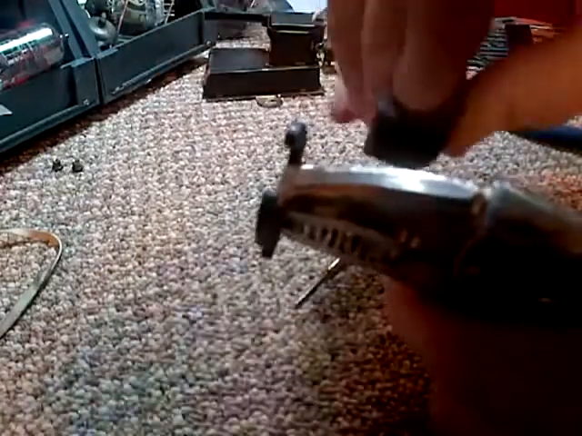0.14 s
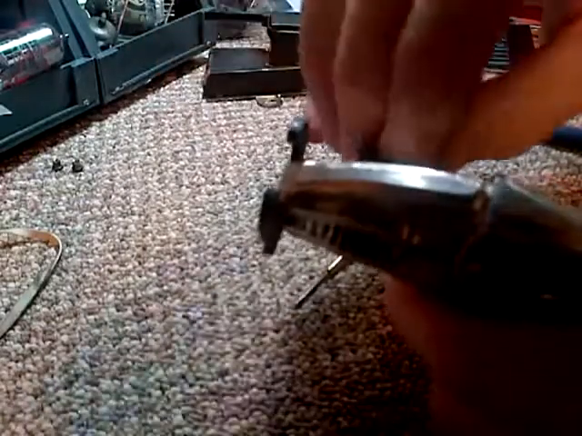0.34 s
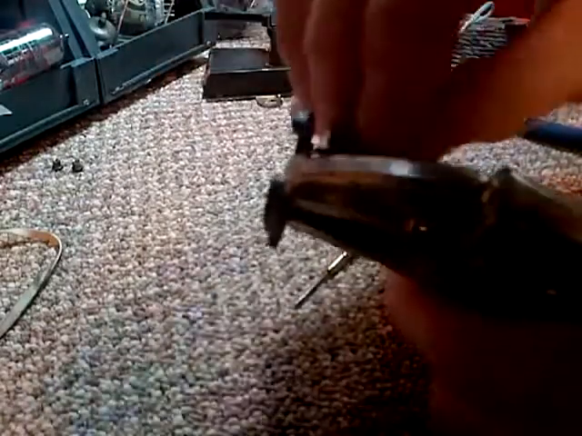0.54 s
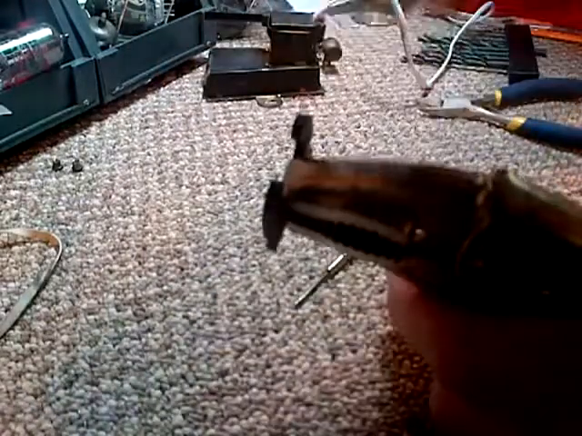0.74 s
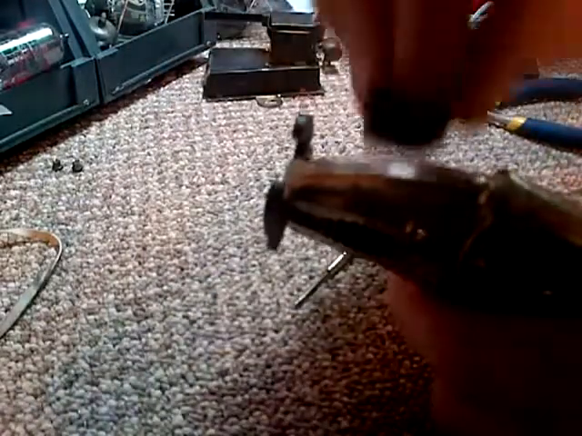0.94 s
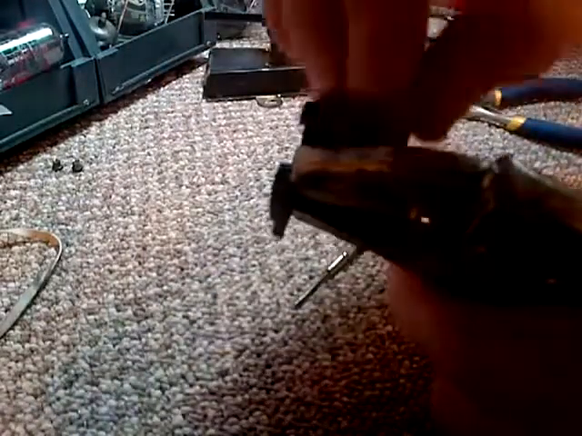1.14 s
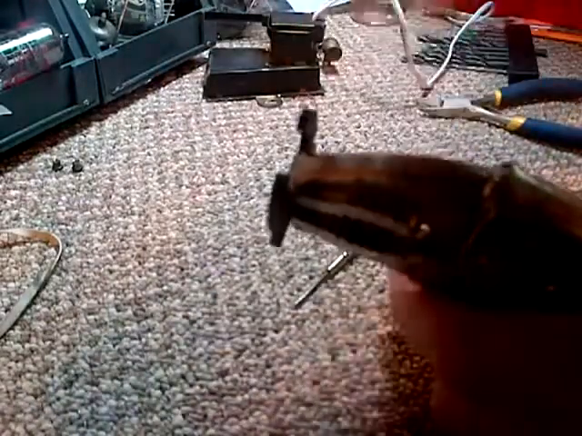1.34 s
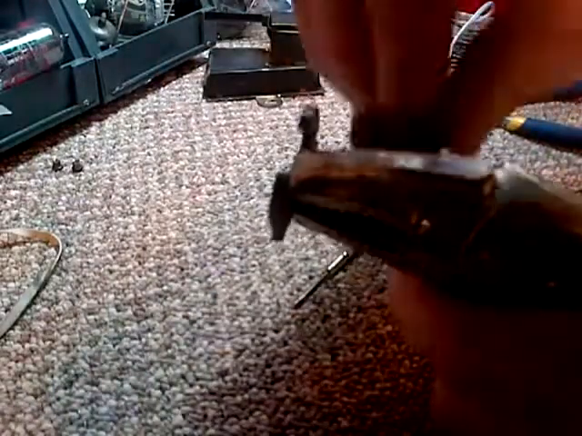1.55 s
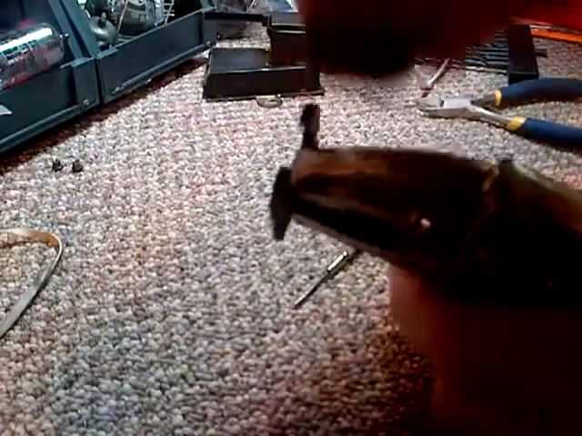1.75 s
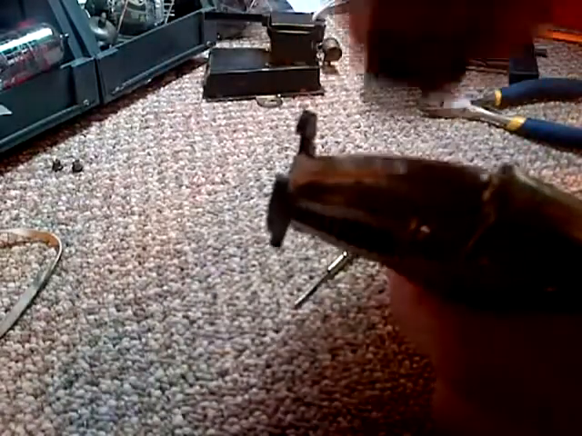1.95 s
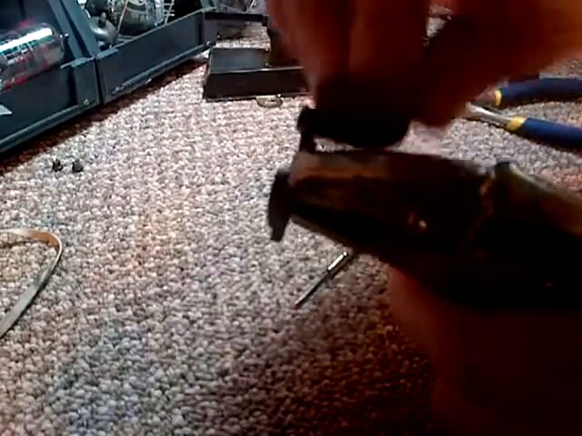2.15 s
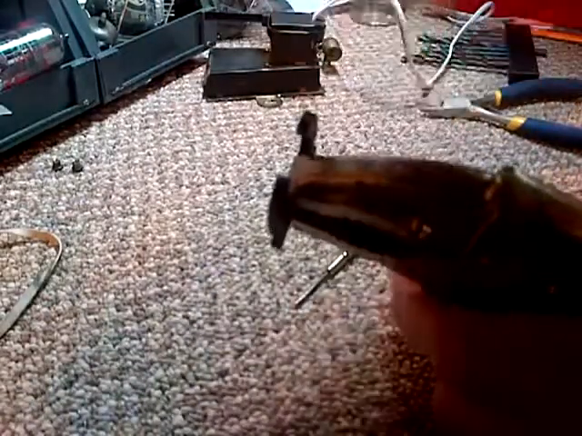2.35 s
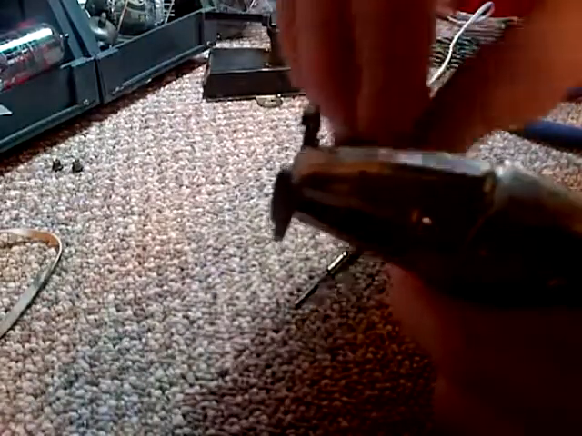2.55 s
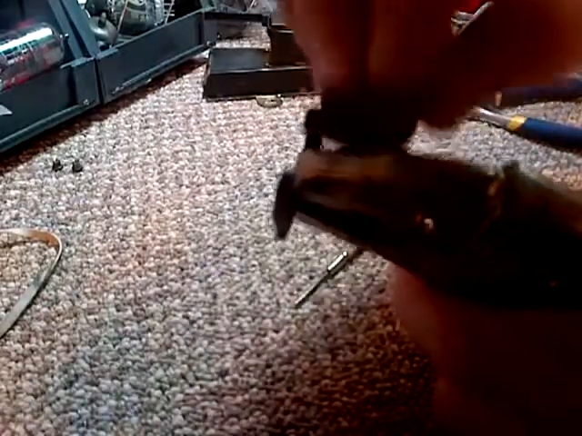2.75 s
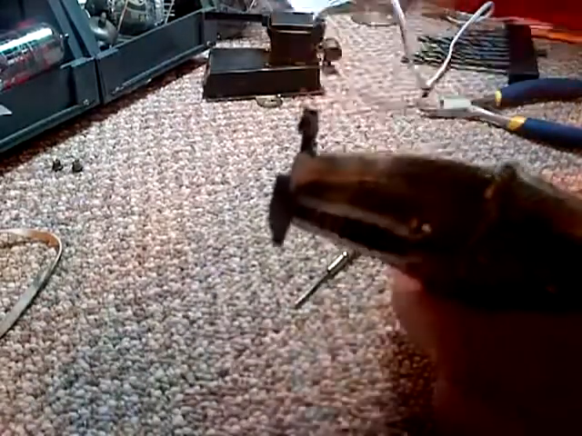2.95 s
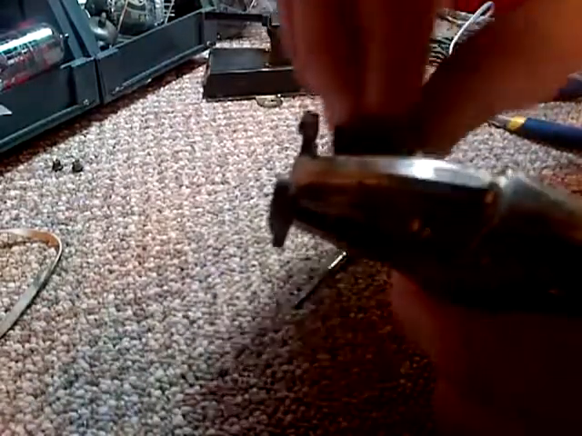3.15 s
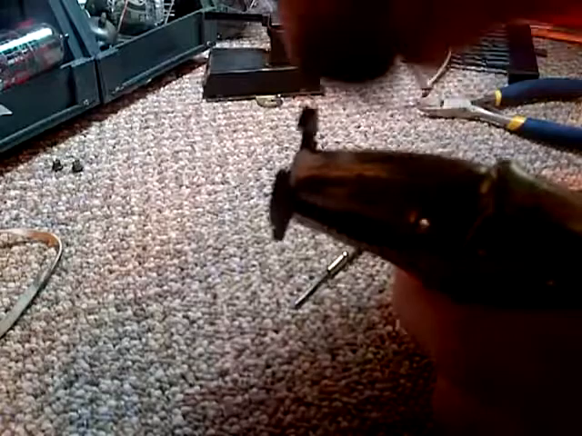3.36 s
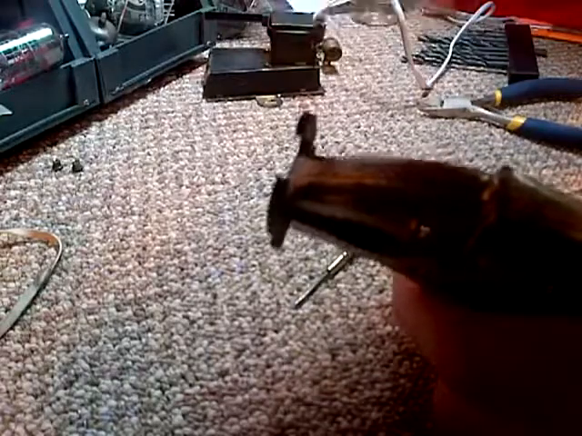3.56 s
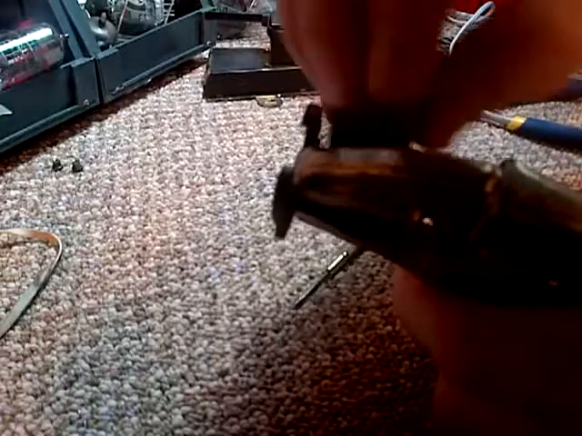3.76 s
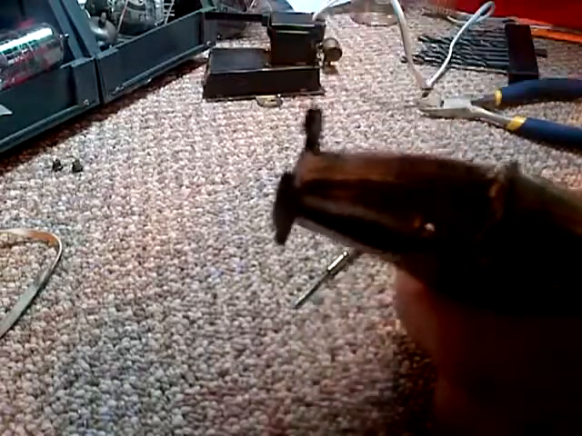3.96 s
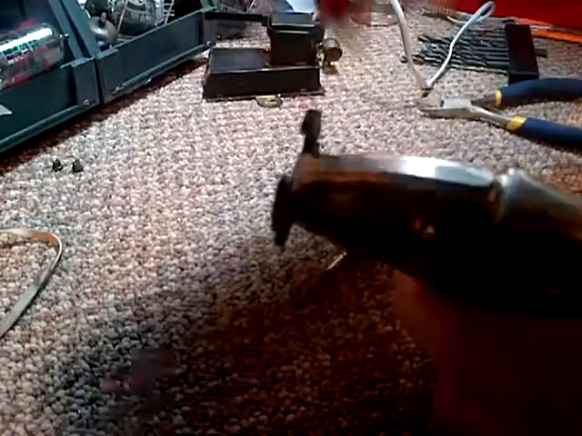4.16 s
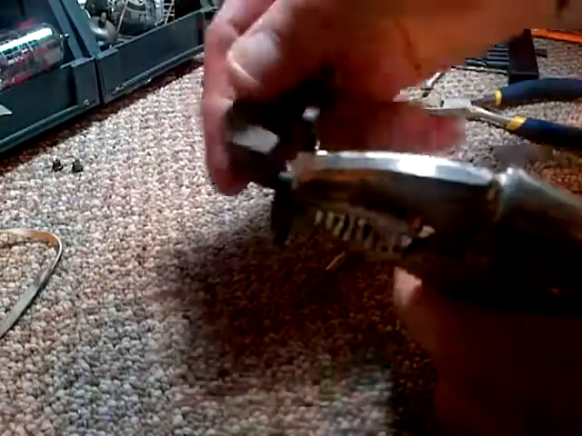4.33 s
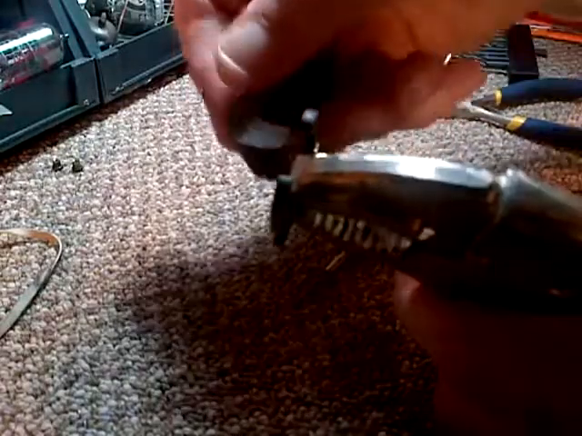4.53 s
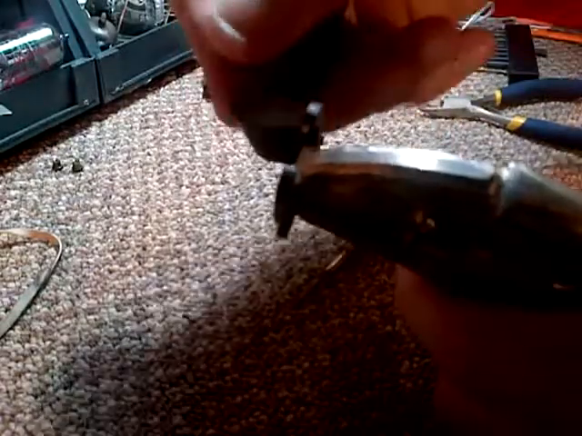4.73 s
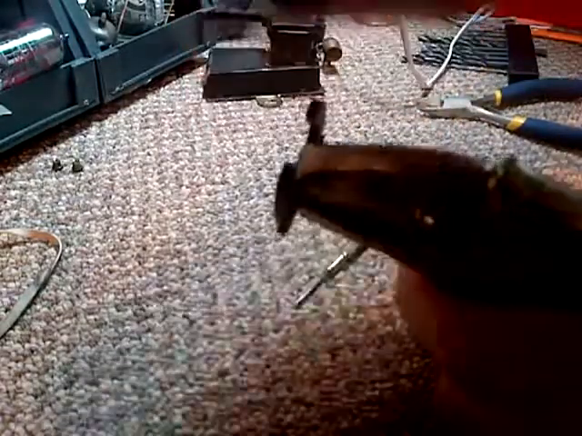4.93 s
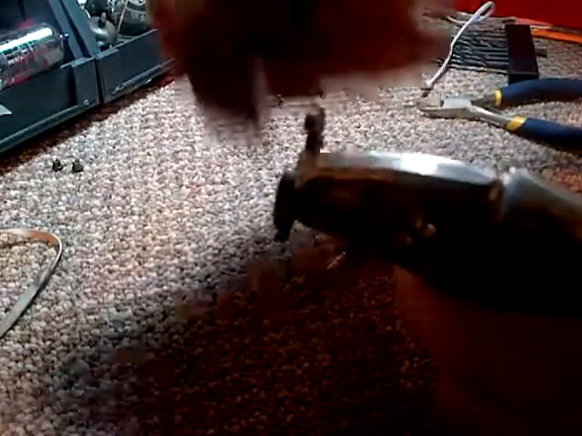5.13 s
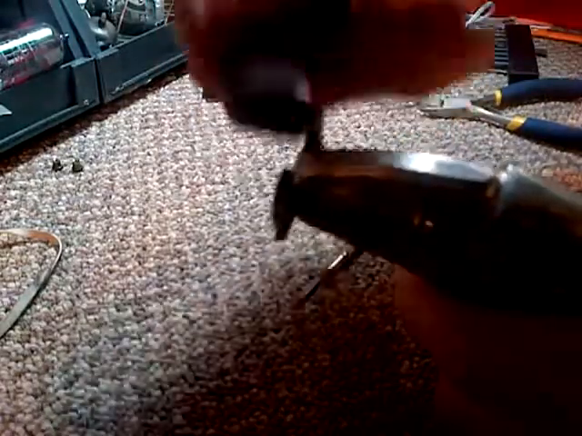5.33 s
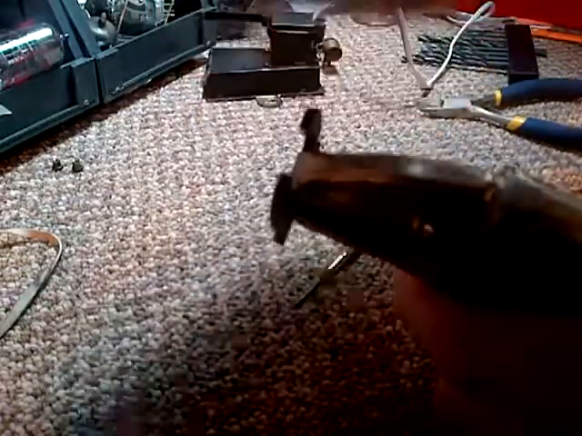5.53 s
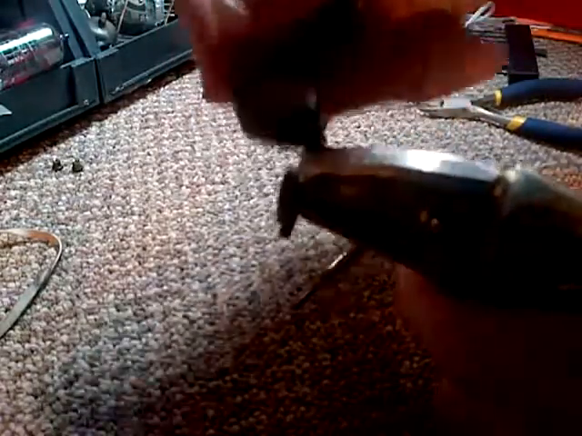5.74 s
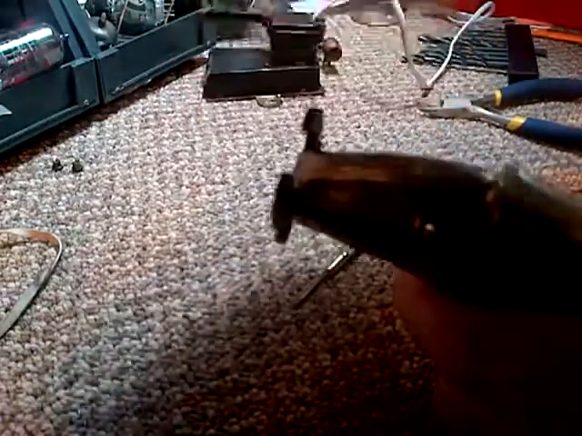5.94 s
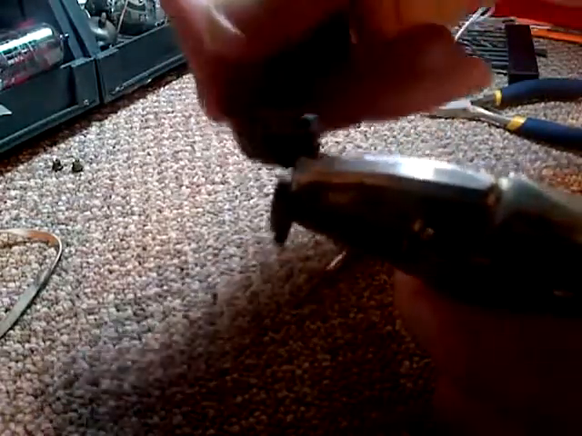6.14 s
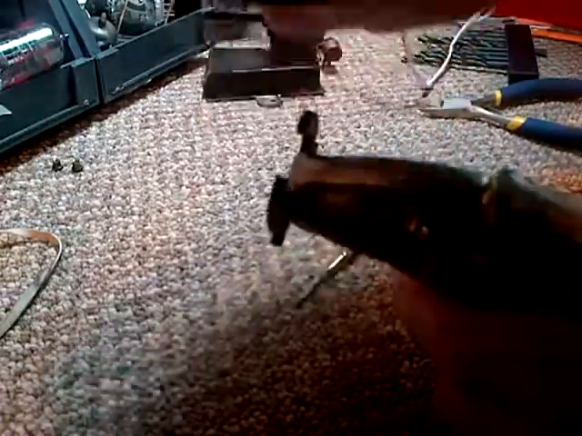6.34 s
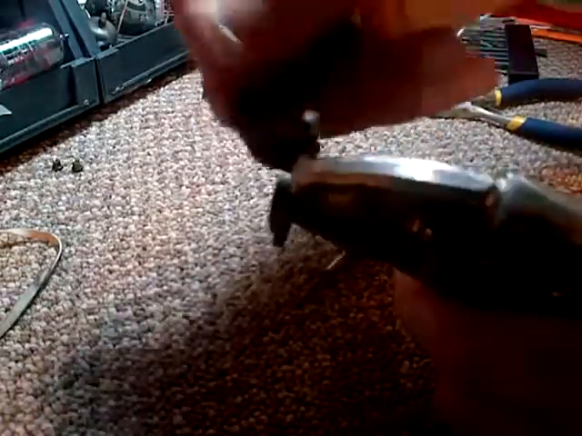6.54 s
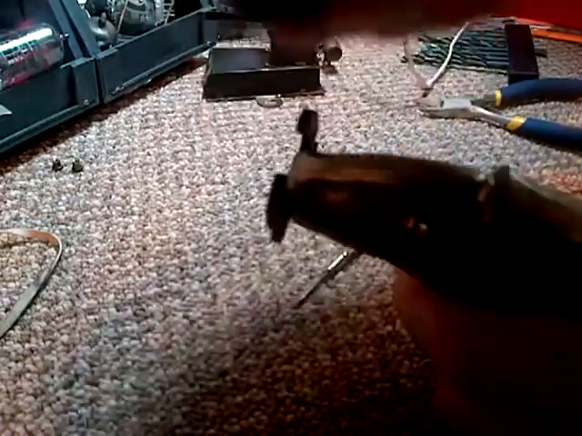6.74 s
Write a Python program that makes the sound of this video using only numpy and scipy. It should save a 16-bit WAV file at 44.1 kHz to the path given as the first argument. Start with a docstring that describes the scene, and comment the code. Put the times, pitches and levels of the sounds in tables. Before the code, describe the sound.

Close, sharp metallic clicks and short rasps as a magnet snaps on and off hand-held metal, over a low hum.

```python
"""A quiet workshop with a low hum. Close to a two-port microphone, a little to the right, a hand snaps a
small magnet onto the top of a hand-held metal piece: it clacks and chatters, rasps as it is dragged along,
then tears loose with a rattle and leaves the metal ringing, seven times over. Just after 4 s the grip
shifts with a soft brush of skin. Five more rounds follow at the tip, where the magnet slips over the edge
with a quick buzz and a ping."""
import sys
import numpy as np
from scipy import signal
from scipy.fft import rfft, irfft
from scipy.io import wavfile

SR = 44100
rng = np.random.default_rng(int(sys.argv[2]) if len(sys.argv) > 2 else 0)


def transcribe(u):
    """Save the signal u as a 16-bit wav file named by the first command-line argument.

    u: samples, shape (n,) or (channels, n), limited to [-1, 1]; the rate is SR.
    q: integer samples, one column per channel.
    """
    v = np.clip(np.atleast_2d(u).T, -1, 1)
    q = np.round(v * 32767).astype(np.int16)
    wavfile.write(sys.argv[1], SR, q)


N = 299439
TIME, FREQS = np.arange(N) / SR, np.fft.rfftfreq(N, 1 / SR)
TIP_FROM_S = 4  # from here on the magnet meets the tip


def gain_of(db):
    """Decibels to amplitude."""
    return 10 ** (np.asarray(db) / 20)


def unit_rms(x):
    """Scales to rms 1."""
    return x / np.sqrt(np.mean(x ** 2) + 1e-20)


def unit_energy(x):
    """Scales to energy 1."""
    return x / np.linalg.norm(x)


def curve(points, hz):
    """Joins (f/Hz, value) points on a log-frequency axis."""
    f, value = np.transpose(points)
    return np.interp(np.log(hz + 1), np.log(f + 1), value)


def fade(t, t60):
    """Falls by 60 dB in t60 seconds."""
    return np.exp(-np.log(1000) * t / np.maximum(t60, 1e-4))


def add(mix, s, sound):
    """Mixes a sound in at time s."""
    part = mix[round(s * SR):][:len(sound)]
    part += sound[:len(part)]


def equalise(x, db_at, size=2048):
    """Minimum-phase EQ whose gain in dB is db_at(Hz)."""
    log_gain = np.log(gain_of(db_at(abs(np.fft.fftfreq(size, 1 / SR)))))
    response = np.exp(np.conj(signal.hilbert(log_gain)))
    taps = np.fft.ifft(response).real[:size // 2]
    return signal.fftconvolve(x, taps)[:len(x)]


def noise(spectrum):
    """Steady noise of rms 1, shaped by (f/Hz, level/dB) points."""
    white = rfft(rng.standard_normal(N))
    return unit_rms(irfft(white * gain_of(curve(spectrum, FREQS)), N))


def room_tone(air_db=-38, waver=.25):
    """The workshop's bed: low rumble, smooth hiss and a hum that wavers in phase and level."""
    # rumble and hiss: f/Hz, level/dB
    spectrum = [(12, -8.5), (20, -2), (60, -0.5), (70, -1), (86, -5.5), (123, -10), (216, -14), (285, -18),
                (802, -26), (1660, -32.5), (1810, -33), (4670, -36), (14700, -38.5), (16000, -45)]
    # stereo likeness of the air: f/Hz, left-right correlation
    correlation = [(30, 0.23), (100, 0.11), (1000, 0.08), (4000, 0.02)]
    # hum partials: f/Hz, level/dB
    partials = [(57, -51.5), (120, -54)]
    same = curve(correlation, FREQS)
    right = noise(spectrum)
    left = irfft(same * rfft(right) + np.sqrt(1 - same ** 2) * rfft(noise(spectrum)), N)
    air = gain_of(air_db) * np.array([left, gain_of(1) * right])
    drift = waver * noise([(1, 0), (4, -6), (12, -50), (40, -140)])
    hum = sum(gain_of(db) * unit_rms(np.sin(2 * np.pi * hz * TIME + drift)) for hz, db in partials)
    return air + hum * (1 + drift)


def reverb(x, near_db=-12, near_t60=0.031, tail_db=-19):
    """Quick reflections from things nearby, then a faint short tail."""
    # decay of the room: f/Hz, t60/s
    decay = [(300, 0.059), (1500, 0.15), (5000, 0.2), (14000, 0.12)]
    t = np.arange(SR // 2) / SR
    near = rng.standard_normal(len(t)) ** 3 * fade(t, near_t60) * (t > .002)
    hz, when, bands = signal.stft(rng.standard_normal(len(t)), SR, nperseg=256)
    bands *= fade(when, curve(decay, hz)[:, None])
    tail = signal.istft(bands, SR, nperseg=256)[1][:len(t)] * (t > .006)
    response = gain_of(near_db) * unit_energy(near) + gain_of(tail_db) * unit_energy(tail)
    return signal.fftconvolve(x, response)[:N]


def far_port(x, lag_samples=17):
    """The left port hears the clicks a little later and duller."""
    # EQ of the left port: f/Hz, gain/dB
    shading = [(700, 2.5), (1300, -13), (2400, -7), (4400, -22), (8100, -15.5), (15000, 4)]
    delay = np.exp(-2j * np.pi * FREQS * lag_samples / SR)
    return irfft(rfft(x) * gain_of(curve(shading, FREQS)) * delay, N)


def grip_shift():
    """Skin brushes the piece as the grip shifts, right of centre."""
    # swell of the brush: t/s, level/dB
    swell = [(4.1, -53), (4.16, -42), (4.5, -50), (4.8, -62)]
    # its dull tone: f/Hz, level/dB
    spectrum = [(120, -10), (330, 2.5), (500, -11.5), (1000, -24), (1600, -21), (6000, -34)]
    envelope = gain_of(np.interp(TIME, *np.transpose(swell)))
    return noise(spectrum) * envelope * gain_of([[-4], [1]])


def hand_bumps(t60=0.092, rise_s=0.00084):
    """Hands and held piece sway in soft, quickly damped thumps."""
    # bumps: t/s, level/dB, f/Hz
    cues = [(0.596, -27.5, 134), (1.247, -26.5, 100), (1.752, -22.5, 127), (2.188, -20.5, 91.5),
            (2.662, -25, 111), (3.33, -20, 85), (4.144, -28, 265)]
    t = np.arange(SR // 3) / SR
    envelope = fade(t, t60) * (1 - np.exp(-t / rise_s))
    track = np.zeros(N)
    for s, db, hz in cues:
        add(track, s, gain_of(db) * np.sin(2 * np.pi * hz * t) * envelope)
    return track


def ping(db, vary_db=0.5):
    """No longer damped by the magnet, the piece rings thinly."""
    # modes of the freed piece: f/Hz, t60/s, level/dB
    modes = [(1160, .17, -6), (4091, .2, -14), (4540, .1, 0), (4940, .55, -16), (6075, .2, -11),
             (7410, .2, -10), (8490, .24, -9)]
    t = np.arange(SR // 2) / SR
    ring = np.zeros(len(t))
    for hz, t60, mode_db in modes:
        gain = gain_of(db + mode_db + vary_db * rng.standard_normal())
        ring += gain * fade(t, t60) * np.sin(2 * np.pi * hz * t)
    return ring * (1 - fade(t, .01))  # softened attack


def metal(s):
    """The piece's answer to one tiny blow at time s: damped clacks and a few thin, long rings."""
    # modes with the magnet on: f/Hz, t60/s, energy struck on top/dB, energy struck at the tip/dB
    modes = [(575, 0.013, -10.5, -17), (765, 0.033, -10, -12.5), (1168, 0.011, 1, 0.5),
             (1480, 0.014, 0.5, -2), (1626, 0.055, -5, -8), (1818, 0.016, -3.5, -1.5), (2127, 0.011, -8, 0),
             (2945, 0.0096, -7.5, -5), (3323, 0.031, -1, -5), (4174, 0.0076, -3.5, 0.5),
             (4474, 0.058, 3.5, 4), (4790, 0.0037, 0, -0.5), (5244, 0.013, 2, 5), (6142, 0.021, 2.5, 6.5),
             (3257, .42, -16, -28), (4091, .22, -20, -17), (5055, .21, -27, -10), (6080, .2, -18, -18),
             (6630, 0.0095, -1.5, 4), (7443, 0.0056, -1.5, -3), (8546, 0.007, 1.5, 4),
             (9510, 0.0032, -1, 1), (11230, 0.0035, -3, -2), (12160, 0.0067, -10.5, -7.5),
             (13540, 0.0028, -15, -9)]
    t = np.arange(SR // 2) / SR
    body = np.zeros(len(t))
    for k, (hz, t60, top_db, tip_db) in enumerate(modes):
        mode = unit_energy(fade(t, t60) * np.sin(2 * np.pi * hz * t))
        body += (-1) ** k * gain_of(tip_db if s > TIP_FROM_S else top_db) * mode
    return body


def contact(force, s, length, db, clack_db, fizz_db, ring_hz, boost_db, ring_width=.05):
    """A force rings the metal; where and how flatly the magnet touches sets clack, fizz and resonance."""
    shelves = [(200, clack_db - 5.5), (600, clack_db), (1900, clack_db),
               (3500, 0), (6500, 0), (10000, fizz_db)]

    def tone_db(hz):
        detune = (hz / ring_hz - 1) / ring_width
        return curve(shelves, hz) + boost_db / (1 + detune ** 2)

    sound = equalise(signal.fftconvolve(force, metal(s)), tone_db)
    return gain_of(db) * unit_energy(sound) * np.sqrt(length * SR)  # energy of `length` seconds at db


def rub(track, s, length, db, rough_spots=85, spread_db=4, grit=.15, arch_db=7, **tone):
    """Stick and slip over a few rough spots: a slow drag is gritty, a quick release a dense buzz."""
    t = np.arange(-SR // 50, SR // 7) / SR
    catches = rng.random(len(t)) < rough_spots / (SR * length)
    strength = gain_of(spread_db * np.minimum(rng.exponential(1, len(t)), 3))
    push = rng.standard_normal(len(t))
    friction = catches * strength * np.sign(push) + grit * push
    pressure = fade(np.maximum(-t, 0), t60=.014) * fade(np.maximum(t - length, 0), t60=.024)
    pressure *= gain_of(-arch_db * abs(np.clip(t / length, 0, 1) - 1 / 3))  # hardest a third of the way
    add(track, s + t[0], contact(friction * pressure, s, length, db, **tone))


def drags():
    """The magnet rasps along the metal; a brighter drag has less low clack."""
    # drags: t/s, length/s, level/dB, brightness/dB, contact resonance/Hz
    cues = [(0.541, 0.038, -28, -6, 3920), (0.643, 0.029, -28, -2, 1540), (0.671, 0.053, -17, 0.5, 8840),
            (1.183, 0.1, -19, -1.5, 3410), (1.731, 0.073, -21.5, -0.5, 3090), (2.181, 0.028, -32, 3, 5050),
            (2.216, 0.051, -28.5, 9, 8850), (2.807, 0.0255, -18.5, 2, 7450), (2.826, 0.088, -37, 7, 5000),
            (3.329, 0.12, -34, 2, 1380), (3.834, 0.056, -34.5, 6, 5050), (4.845, 0.064, -45.5, -8, 1590),
            (5.303, 0.081, -46, -3, 2460), (6.271, 0.035, -40.5, 0.5, 1570)]
    track = np.zeros(N)
    for s, length, db, bright_db, ring_hz in cues:
        clack_db = 3.5 - 0.76 * bright_db
        rub(track, s, length, db, clack_db=clack_db, fizz_db=bright_db, ring_hz=ring_hz, boost_db=10.5)
    return track


def slips(scrape_s=0.029, scrape_db=-14.5, ping_db=-11):
    """The magnet buzzes over the edge of the tip; a fainter scrape and a ping follow."""
    # slips: t/s, length/s, level/dB
    cues = [(4.893, 0.013, -18), (5.371, 0.0032, -14), (5.814, 0.012, -15.5), (6.233, 0.0044, -27.5),
            (6.693, 0.013, -13)]
    track = np.zeros(N)
    for s, length, db in cues:
        end = s + length
        rub(track, s, length, db, clack_db=0, fizz_db=1.5, ring_hz=5500, boost_db=12.5)
        rub(track, end, scrape_s, db + scrape_db, clack_db=-1, fizz_db=-2.5, ring_hz=1816, boost_db=13.5)
        add(track, end, ping(db + ping_db))
    return track


def releases():
    """The magnet comes loose in a short bright tear, and the freed piece pings."""
    # tears: t/s, length/s, level/dB, ping level/dB
    cues = [(0.735, 0.012, -16.5, -26), (1.291, 0.012, -16.5, -25.5), (1.806, 0.008, -13, -22),
            (2.275, 0.0059, -16, -28), (2.902, 0.0033, -22.5, -38), (3.427, 0.0062, -14.5, -29.5),
            (3.911, 0.017, -19, -29.5), (5.432, 0.011, -28.5, -55), (6.308, 0.0084, -27.5, -53)]
    track = np.zeros(N)
    for s, length, db, ping_db in cues:
        if s > TIP_FROM_S:
            rub(track, s, length, db, clack_db=-15, fizz_db=-3, ring_hz=4530, boost_db=18.5)
        else:
            rub(track, s, length, db, clack_db=-8.5, fizz_db=2.5, ring_hz=7700, boost_db=8)
        add(track, s + 0.76 * length, ping(ping_db))  # rings free just before the tear ends
    return track


def snaps(blow_s=.01, chatter_t60=0.038, settle_db=-12, settle_t60=0.073):
    """The magnet lands on an edge with one hard blow, then chatters as it is pulled flat."""
    # landings: t/s, level/dB, fizz/dB, contact resonance/Hz, its boost/dB, chatter/dB
    cues = [(0.5279, -14, -10, 4110, 9, 35), (0.582, -19, 2, 1710, 4, 0), (1.163, -18, -7.5, 1625, 8, 7.5),
            (1.203, -18, 13, 8640, 23, -7), (1.6953, -7, -9, 1650, 8.5, 2), (1.7187, -15.5, 9, 6250, 4, 4),
            (2.1592, -18.5, 6.5, 6370, 13, 2), (2.1792, -19.5, -1, 1270, 10.5, 1),
            (2.638, -10.5, -6, 7800, -1, 11), (2.6546, -14, -7, 4500, 9, -2),
            (2.6733, -24.5, 5.5, 1160, -11, 6), (2.8067, -8.5, -3.5, 1776, 17.5, 2.5),
            (3.2884, -19.5, 3.5, 8700, 7, 7), (3.32, -24, 4, 5720, 30, 0),
            (3.8306, -12, 11.5, 1320, 12, 7.5), (4.7836, -17.5, 4, 4450, 10, 30),
            (5.2849, -5.5, -17, 2720, 8, -1.5), (5.707, -10, 1.5, 5060, 13, 3),
            (6.1659, -8.5, 2.5, 5190, 14.5, -15), (6.5928, -9.5, 1.5, 5150, 10.5, 12)]
    t = np.arange(SR // 12) / SR
    track = np.zeros(N)
    for s, db, fizz_db, ring_hz, boost_db, chatter_db in cues:
        chatter = unit_energy(rng.standard_normal(len(t)) * fade(t, chatter_t60))
        bounces = unit_energy(rng.standard_normal(len(t)) ** 3 * fade(t, settle_t60))
        force = gain_of(chatter_db) * chatter + gain_of(settle_db) * bounces
        force[0] += 1  # the blow itself
        clack_db = -0.99 * (db + 12.5)  # a harder landing is a shorter blow with less low clack
        add(track, s, contact(force, s, blow_s, db, clack_db, fizz_db, ring_hz, boost_db))
    return track


def scene():
    """The magnet's gestures reach both ports, over handling noise and room tone."""
    magnet = snaps() + drags() + releases() + slips()
    handling = hand_bumps() + grip_shift()
    left = far_port(magnet) + reverb(magnet)
    right = magnet + reverb(magnet)
    return np.array([left, right]) + handling + room_tone()


def record(dry, cutoff_hz=16100):
    """Clips the hardest snaps at full scale, then cuts the extreme treble."""
    lowpass = signal.firwin(511, cutoff_hz, window=("kaiser", 9), fs=SR)
    return signal.oaconvolve(np.clip(dry, -1, 1), lowpass[None], "same")


dry = scene()
out = record(dry)
transcribe(out)
```